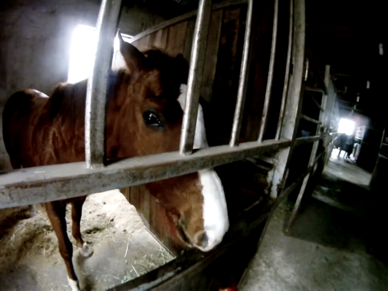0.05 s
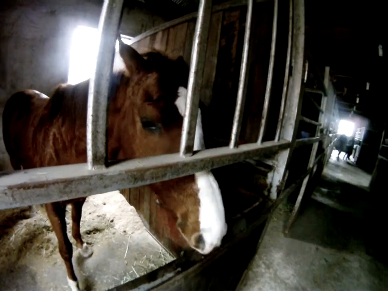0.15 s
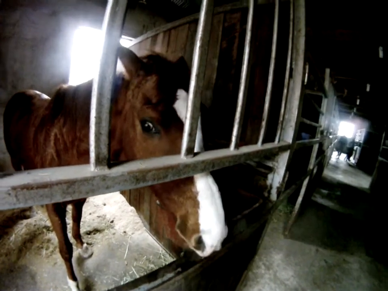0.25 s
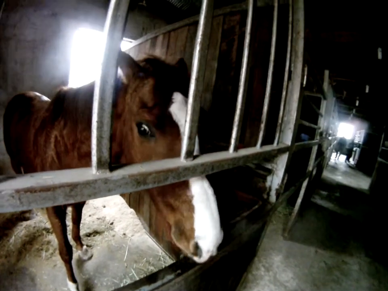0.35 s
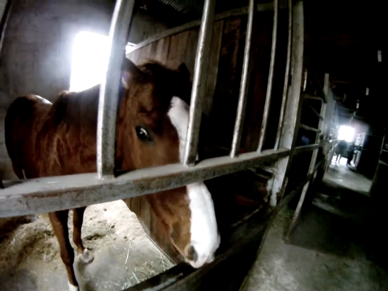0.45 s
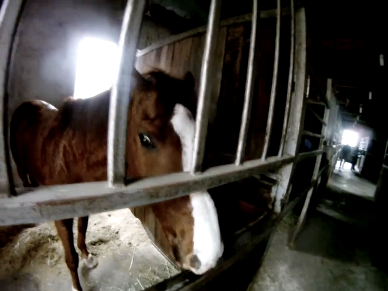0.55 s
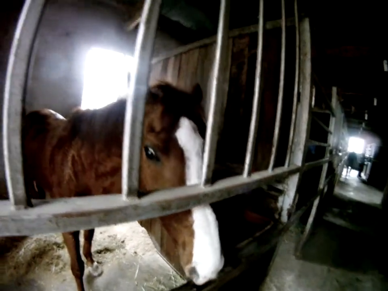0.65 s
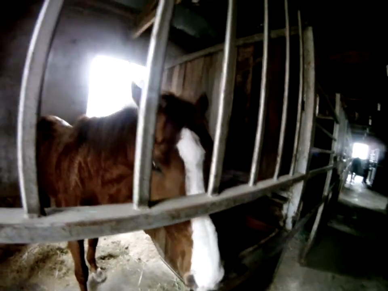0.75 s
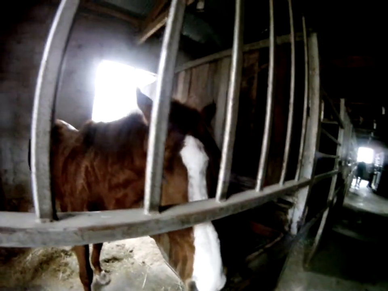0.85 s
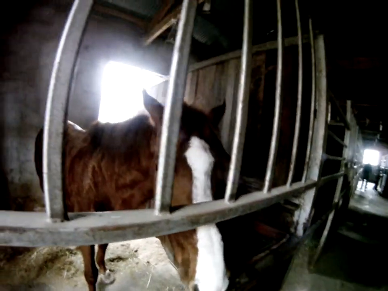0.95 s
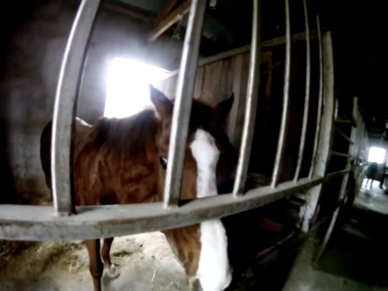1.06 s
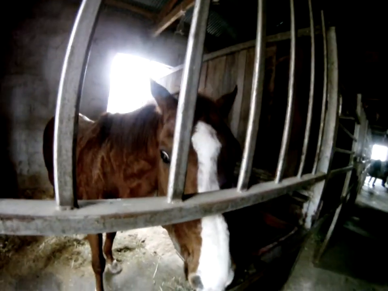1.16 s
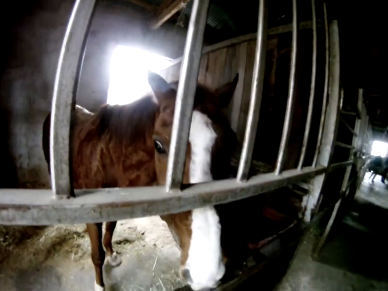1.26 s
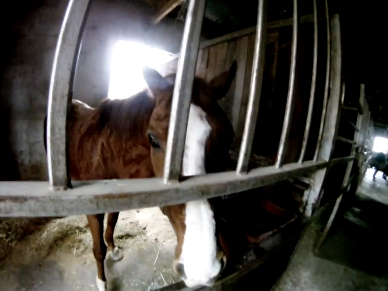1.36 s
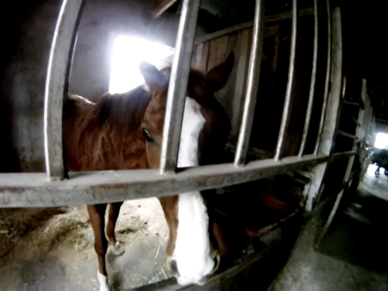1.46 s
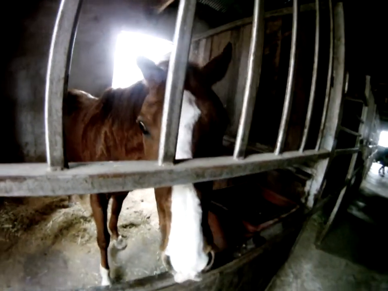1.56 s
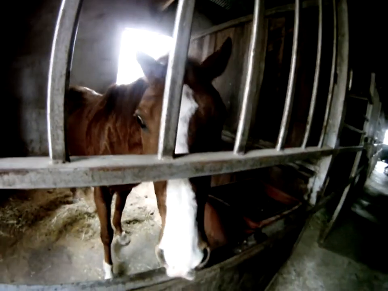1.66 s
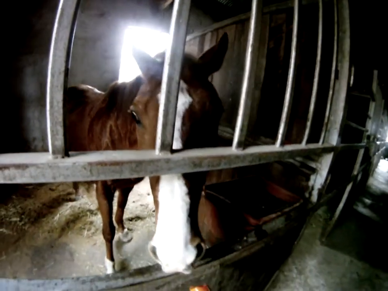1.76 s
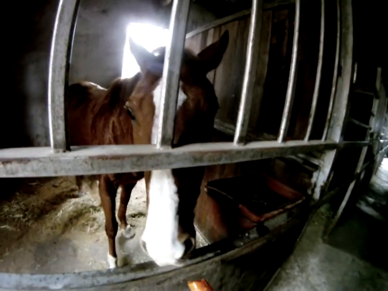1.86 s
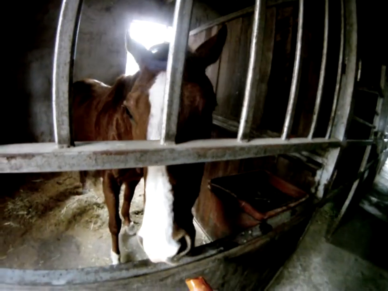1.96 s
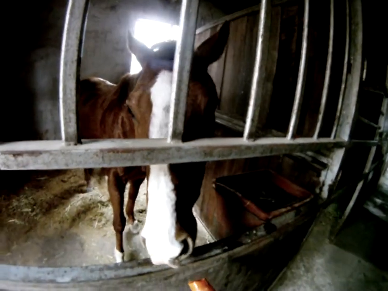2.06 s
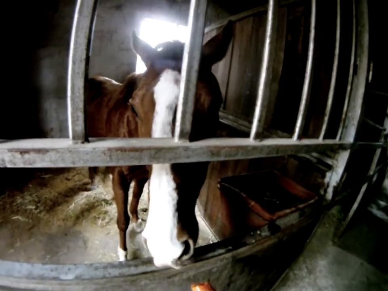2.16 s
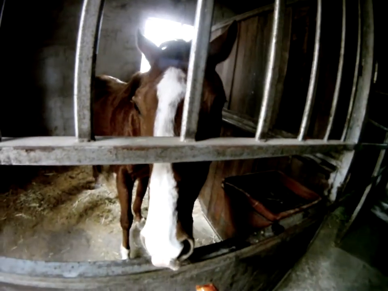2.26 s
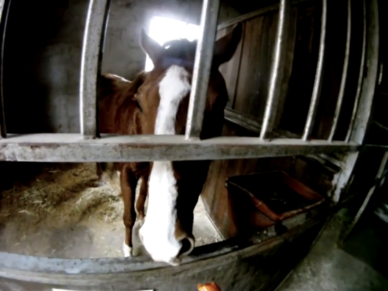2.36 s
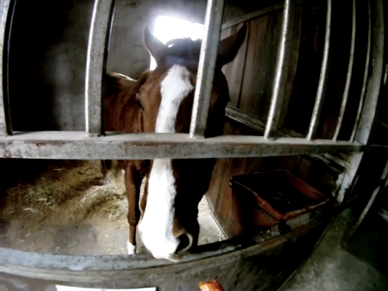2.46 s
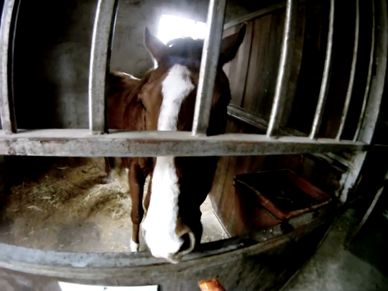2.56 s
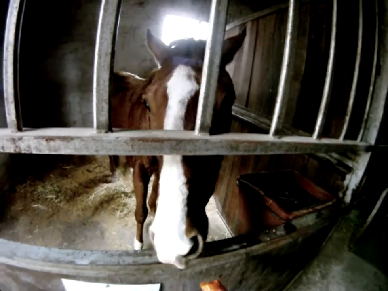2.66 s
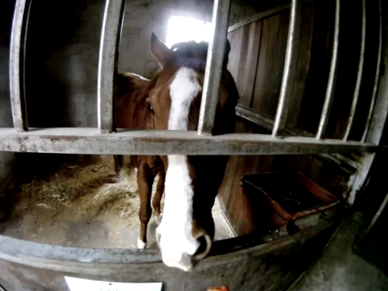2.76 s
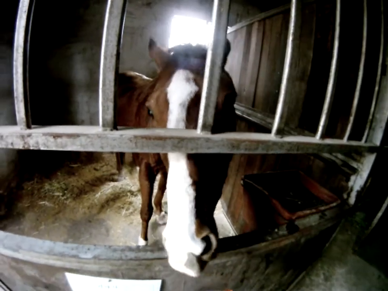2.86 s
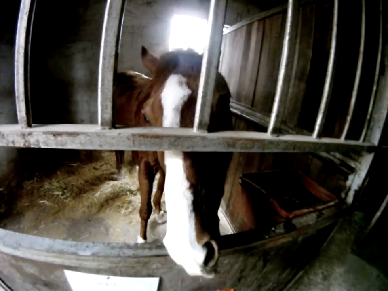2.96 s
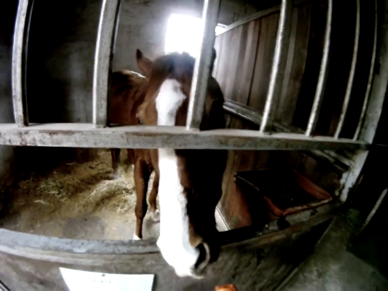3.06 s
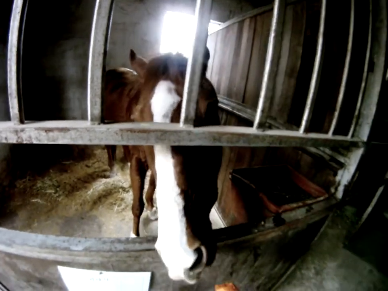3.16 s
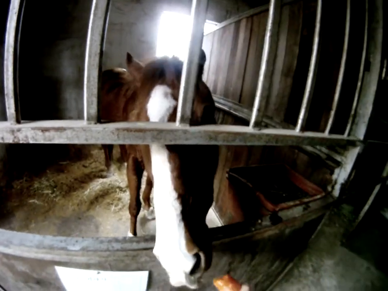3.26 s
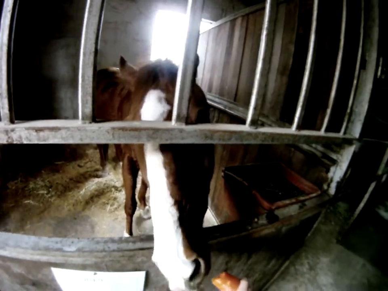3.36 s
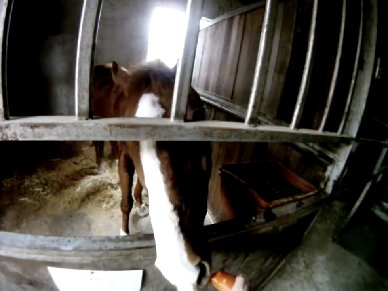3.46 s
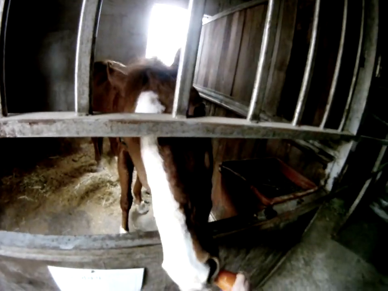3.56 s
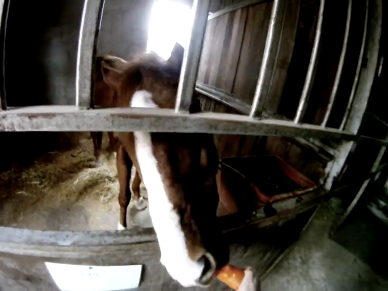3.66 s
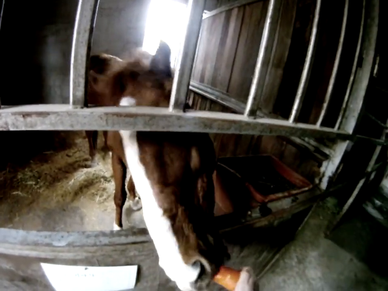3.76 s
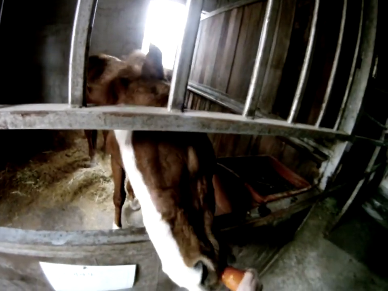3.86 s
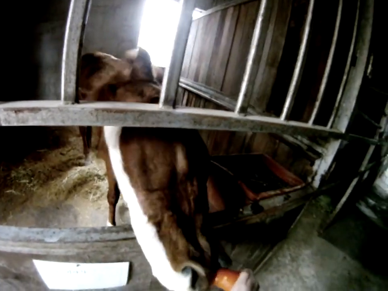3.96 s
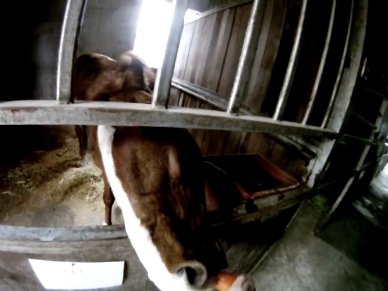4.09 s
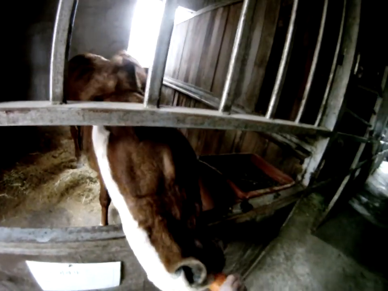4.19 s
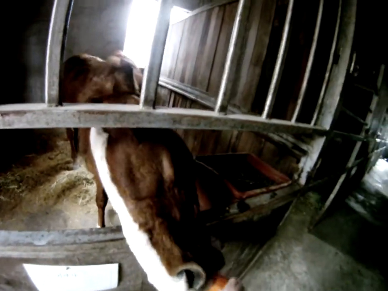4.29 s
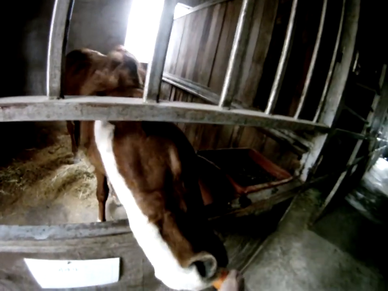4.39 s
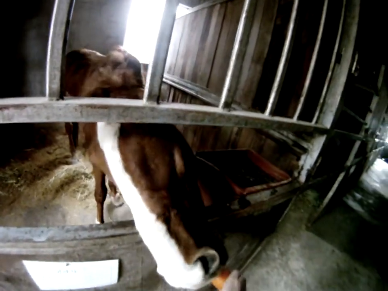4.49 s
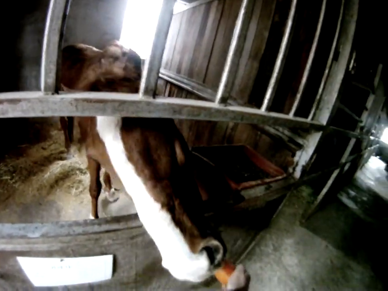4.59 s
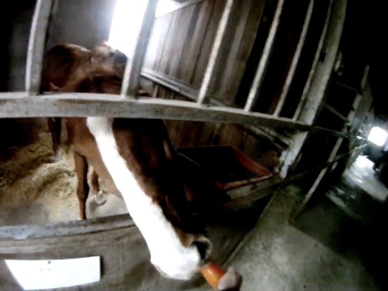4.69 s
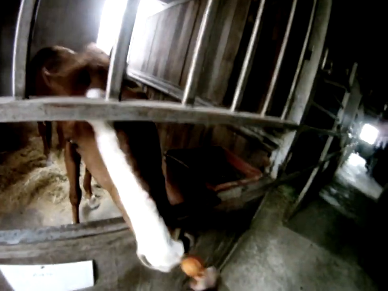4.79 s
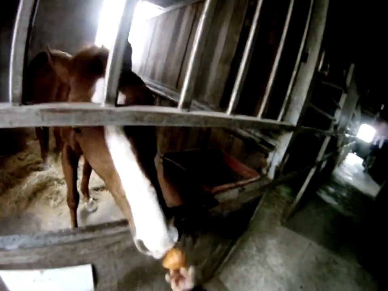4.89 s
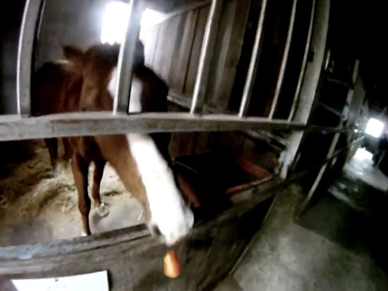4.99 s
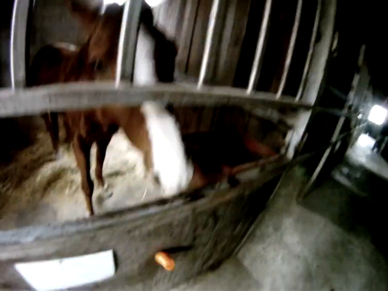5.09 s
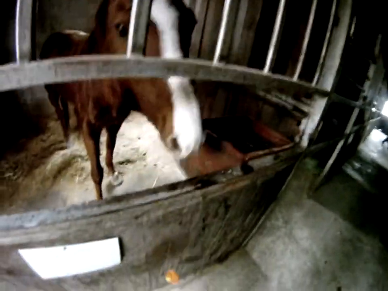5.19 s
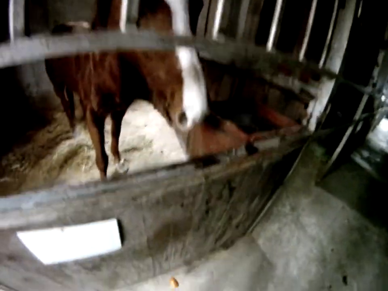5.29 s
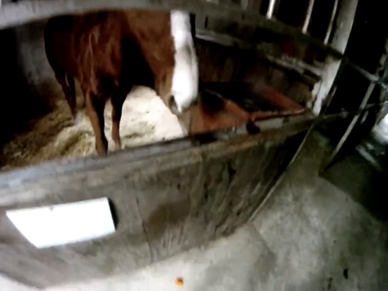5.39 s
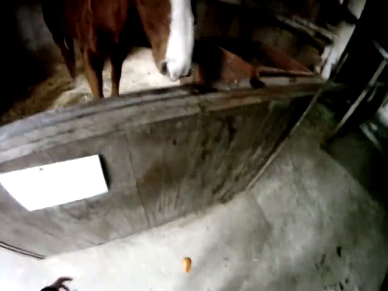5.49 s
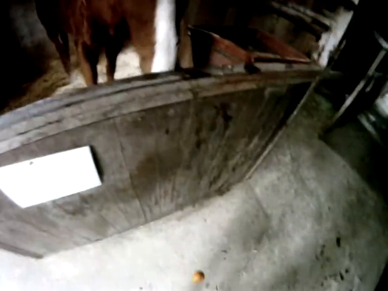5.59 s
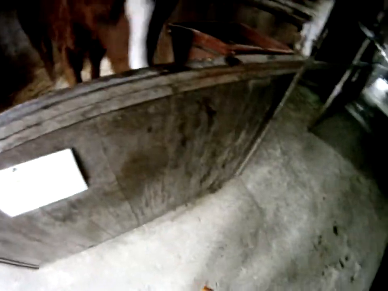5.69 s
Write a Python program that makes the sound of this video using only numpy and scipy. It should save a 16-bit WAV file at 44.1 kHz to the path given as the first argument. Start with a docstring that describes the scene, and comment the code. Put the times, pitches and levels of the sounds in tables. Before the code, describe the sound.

Very close, almost mono sound from a hand-held camera in a plastic case inside a quiet stable. Faint air hiss and low swaying rumble run throughout, with fingers rubbing the shell. Sparse ticks, dull bumps and tiny crisp snaps appear as a horse reaches for a carrot. Handling grows restless, then one sharp, hard knock strikes the case, followed by small ticks and a gritty scuff on concrete.

```python
"""A horse reaches through its stall bars for a carrot and drops it, in a quiet stable, heard from a camera
in a hand-held plastic case. From the start there is still air and hiss (shaped noise), a swaying rumble and
skin rubbing the shell (tiny random slips). Soon ticks and dull bumps (dying sines) join in, later faint
squeaks and small snaps (noise bursts). Near the end the hand grows restless and one sharp knock hits the
case (a flexing wall, ringing shell and gritty crack), followed by a scuff on the floor."""
import sys
import numpy as np
from scipy import signal
from scipy.fft import rfft, irfft, next_fast_len
from scipy.io import wavfile
from scipy.ndimage import map_coordinates

SR = 44100
rng = np.random.default_rng(int(sys.argv[2]) if len(sys.argv) > 2 else 0)


def generate_wav(sig):
    """Save sig (samples, or channels by samples) to the path in sys.argv[1] as 16-bit PCM at SR."""
    pcm = np.round(np.clip(np.atleast_2d(sig).T, -1, 1) * 32767).astype(np.int16)
    wavfile.write(sys.argv[1], SR, pcm)


N = 252913  # length in samples

# How strongly two places on the case wall sound at each pitch. Each row: pitch in Hz, relative level in dB.
LOW_WALL = [(100, -29), (600, -19), (950, -3.5), (1180, 5.5), (1300, -2), (1430, -8), (2000, -22),
            (2900, -25), (8000, -39), (10800, -28), (12000, -20), (13200, -22), (15500, -38)]
MIDDLE_WALL = [(100, -35), (700, -18.5), (1200, -14), (1450, -10.5), (1720, 2.5), (2000, 4), (2300, -8),
               (2800, -25.5), (5000, -33.5), (8000, -33), (10200, -20), (11500, -37.5), (14000, -22),
               (15500, -45)]
# The hard contacts as the camera chatters in its case. Each row: time in seconds, relative level in dB.
CHATTER_HITS = [(5.445, -17), (5.4462, -8.5), (5.4507, -19), (5.4529, -13.5), (5.4554, -6.5)]


def amp(db):
    """Turn decibels into a gain."""
    return 10 ** (np.asarray(db) / 20)


def unit(x):
    """Scale a sound to an rms level of 1."""
    return x / np.sqrt(np.mean(x ** 2) + 1e-20)


def clock():
    """The time of every sample, in seconds."""
    return np.arange(N) / SR


def along(points, hz):
    """Read a curve of (Hz, value) points, joined by straight lines on a log pitch axis."""
    point_hz, values = np.transpose(points)
    return np.interp(np.log(hz + 1), np.log(point_hz + 1), values)


def bells(peaks, hz):
    """Add up bell-shaped peaks or dips, in decibels."""
    return sum(db / (1 + (2 * (hz - centre) / width) ** 2) for centre, width, db in peaks)


def coloured(x, gain_db):
    """Filter a sound with any curve of decibels against pitch, without sounding ahead of time."""
    size = 2 * next_fast_len(N // 2 + SR // 4)
    log_gain = np.log(amp(gain_db(np.fft.rfftfreq(size, 1 / SR))))
    # folding the cepstrum onto positive times gives a filter that only reacts afterwards
    cepstrum = irfft(log_gain, size)
    cepstrum[1:size // 2] *= 2
    cepstrum[size // 2 + 1:] = 0
    response = np.exp(rfft(cepstrum))
    return irfft(rfft(x, size) * response, size)[:N]


def noise(spectrum):
    """Steady noise of rms 1 with the given spectrum."""
    return unit(coloured(rng.standard_normal(N), lambda hz: along(spectrum, hz)))


def fade(s, t60):
    """An envelope that jumps up at s and falls by 60 dB in t60 seconds."""
    envelope, start = np.zeros(N), round(s * SR)
    age = np.arange(min(round(2 * t60 * SR), N - start)) / SR
    envelope[start:start + len(age)] = amp(-60 * age / t60)
    return envelope


def struck(s, t60, rise):
    """A dying envelope that takes a moment to build up."""
    return fade(s, t60) * (1 - fade(s, rise))


def swell(t, s, length):
    """A bell-shaped envelope around s whose power is above half for the given length."""
    return np.exp(-np.log(4) * np.minimum(((t - s) / length) ** 2, 20))


def tone(envelope, hz):
    """A sine under an envelope, starting where the envelope does."""
    out, on = np.zeros(N), np.flatnonzero(envelope > 1e-7)
    out[on] = envelope[on] * np.sin(2 * np.pi * hz * np.arange(len(on)) / SR)
    return out


def wobble(rate):
    """A smooth random curve through `rate` random values a second."""
    coarse = clock()[::200]
    curve = map_coordinates(rng.standard_normal(256), [coarse * rate], mode="mirror")
    return np.interp(clock(), coarse, curve)


def driven(law):
    """The gain of a sound that grows with the effort of the hand and wavers on its own."""
    # How restless the hand is: calm at first, it shifts as the carrot is offered.
    # Each row: time in seconds, effort in dB.
    effort_points = [(0, -20), (0.3, -16), (0.45, -20), (1.15, -16.5), (2.45, -19), (2.8, -19),
                     (3.1, -11.5), (3.42, -14.5), (3.65, -11), (4.2, -9.5), (4.46, -13.5), (4.62, -1.5),
                     (4.9, 0), (5.35, 0), (5.73, -6)]
    level_db, growth, waver_db = law
    effort_db = np.interp(clock(), *np.transpose(effort_points))
    return amp(level_db + growth * effort_db + waver_db * wobble(rate=11))


def friction(wall, slips_per_s, spread_db, smooth):
    """Gritty contact: tiny slips of uneven size and a smooth hiss ring one wall curve and the overtones."""
    # Narrow overtones of the shell. Each row: pitch in Hz, width in Hz, height in dB.
    overtone_peaks = [(3655, 460, 10.5), (8350, 180, 10.5), (9920, 520, 14.5), (10810, 230, 17),
                      (13150, 230, 6), (14000, 740, 13)]
    happens = rng.random(N) < slips_per_s / SR
    sizes = amp(spread_db * rng.standard_normal(N))
    slips = happens * rng.choice([-1, 1], N) * sizes
    force = unit(slips) + smooth * rng.standard_normal(N)
    return unit(coloured(force, lambda hz: along(wall, hz) + bells(overtone_peaks, hz)))


def stable(level_db=-63.5):
    """The still air of the stable and the microphone's hiss, as steady shaped noise."""
    # Each row: pitch in Hz, relative level in dB.
    air_spectrum = [(20, 6.5), (60, 12), (150, 5.5), (300, 3.5), (700, -1.5), (1150, -3), (1420, -4),
                    (2050, -6), (2800, -6.5), (5000, -10), (7000, -13), (10000, -16), (12000, -16),
                    (14300, -19.5)]
    return amp(level_db) * noise(air_spectrum)


def movement():
    """The swaying hand rumbles through the case and lurches now and then, over a dull shuffle."""
    # Low rumble of the sway, then the shuffle. Each row: pitch in Hz, relative level in dB.
    sway_spectrum = [(5, -28.5), (14, 3), (32, 2.5), (45, -9.5), (75, -26), (130, -41.5), (300, -56.5)]
    shuffle_spectrum = [(30, -28), (90, -0.5), (220, 0), (400, -9), (750, -9.5), (1100, -11.5), (2500, -38),
                        (8000, -64)]
    # How each follows the hand: level at full effort in dB, dB per dB of effort, random wavering in dB.
    sway_law = (-42.5, 0.95, 1.4)
    shuffle_law = (-61, 0.41, 0.86)
    # The hand jerks and rocks the whole camera.
    # Each row: middle in seconds, length in seconds, level in dB, pitch in Hz.
    lurch_rows = [(0.359, .02, -47.5, 44.8), (1.554, .055, -34, 31), (4.181, .1, -43.5, 23.97),
                  (4.665, .08, -30.5, 22.88)]
    lurches = sum(amp(db) * tone(swell(clock(), s, length), hz) for s, length, db, hz in lurch_rows)
    sway = driven(sway_law) * noise(sway_spectrum)
    shuffle = driven(shuffle_law) * noise(shuffle_spectrum)
    return lurches + sway + shuffle


def stroke_power(t, catch_s=0.045, reach_db_per_octave=25, skew=1.13, edge=2.5):
    """Power in each wall mode: every stroke shares its own among the modes nearest to its pitch."""
    # A finger slides on the shell. Each row: middle of the first catch in seconds, length in seconds,
    # level in dB, pitch it excites most in Hz, number of times it catches.
    stroke_rows = [(0.623, 0.055, -57, 1680, 1), (0.823, .085, -66.5, 2120, 1),
                   (1.22, 0.041, -62.5, 1260, 1), (1.4, 0.053, -57, 2200, 1), (1.51, 0.22, -61.5, 2320, 1),
                   (1.788, 0.038, -60.5, 1150, 1), (1.997, 0.085, -60.5, 2380, 1),
                   (2.368, .068, -60.5, 1150, 1), (2.554, 0.072, -55, 2300, 1), (2.75, 0.065, -61, 2400, 1),
                   (2.88, .028, -55, 1360, 1), (3.22, 0.22, -62.5, 2300, 1), (3.471, 0.03, -56, 1540, 1),
                   (4.043, 0.062, -62, 1800, 1), (4.167, .022, -53, 1540, 5), (4.59, .11, -56.5, 2360, 1),
                   (4.657, 0.072, -55.5, 1400, 1), (4.762, 0.026, -48.5, 1720, 2),
                   (4.946, .042, -48, 1700, 1), (5.03, .022, -52, 1680, 1), (5.129, 0.093, -49, 1800, 1),
                   (5.261, .028, -52, 1760, 2), (5.42, 0.076, -53, 2050, 1), (5.538, 0.028, -52.5, 2060, 1),
                   (5.635, .028, -48, 2380, 1), (5.702, 0.058, -53, 2090, 1)]
    # Pitches of the low, damped, middle and high wall modes, in Hz.
    wall_hz = (1180, 1490, 1870, 2360)
    power = np.zeros((len(wall_hz), len(t)))
    for s, length, db, hz, catches in stroke_rows:
        octaves_away = np.abs(np.log2(np.array(wall_hz) / hz))
        share = amp(-reach_db_per_octave * octaves_away) ** 2
        # a juddering finger catches again every catch_s seconds
        for middle in s + catch_s * np.arange(catches):
            # it starts faster and ends slower than an even swell; an edge of 2 would be a plain bell
            half_length = length / 2 * skew ** np.sign(t - middle)
            envelope = .5 ** np.minimum(np.abs((t - middle) / half_length) ** edge, 60)
            power += np.outer(share / share.sum(), amp(db) ** 2 * envelope)
    return power


def fingers():
    """Finger strokes drive four wall modes, over the constant small rubbing of the grip."""
    # The wall damped by the fingers, so broader, and the high wall.
    # Each row: pitch in Hz, relative level in dB.
    damped_wall = [(100, -35), (700, -15), (1000, -4), (1350, 1.5), (1700, -2), (2200, -7), (2900, -22),
                   (8000, -31), (11500, -28), (14000, -23), (15500, -38)]
    high_wall = [(100, -44), (1400, -30), (1900, -3.5), (2280, 8.5), (2520, -1.5), (2900, -13.5),
                 (3600, -14.5), (5000, -20.5), (8000, -21), (9600, -16.5), (11000, -34.5), (14400, -20),
                 (15500, -29)]
    # How rubbing follows the hand, before the mode shares below:
    # level at full effort in dB, dB per dB of effort, random wavering in dB.
    rub_law = (-61.5, 0.64, 1.6)
    # How much the resting grip rubs the low, damped, middle and high modes, in dB.
    rub_shares_db = (-4, -6, -1.5, -0.5)
    coarse = clock()[::40]
    gains = []
    for power, rub_db in zip(stroke_power(coarse), rub_shares_db):
        stroke_gain = np.interp(clock(), coarse, np.sqrt(power))
        rub_gain = amp(rub_db) * driven(rub_law)
        gains.append(np.hypot(stroke_gain, rub_gain))  # adds their powers
    low, damped, middle, high = gains
    return (low * friction(LOW_WALL, slips_per_s=500, spread_db=2.5, smooth=0.25)
            + damped * friction(damped_wall, slips_per_s=800, spread_db=3, smooth=0.6)
            + middle * friction(MIDDLE_WALL, slips_per_s=900, spread_db=0.5, smooth=0.7)
            + high * friction(high_wall, slips_per_s=700, spread_db=3, smooth=0.64))


def ticks(low_hz=1220, middle_hz=1950, grit_db=-3):
    """A sudden slip of the grip plucks two wall modes and sets off a short gritty burst in them."""
    # Each row: time in seconds, low mode level in dB, middle mode level in dB, time to fall 60 dB in seconds.
    # The levels are those before the soft start.
    tick_rows = [(0.341, -57, -44.5, 0.013), (1.966, -56, -48, 0.02), (2.004, -65, -48.5, 0.033),
                 (3.188, -59, -50, 0.042), (4.023, -53, -33, 0.028), (4.589, -28, -37, 0.027),
                 (4.629, -36, -46, 0.03), (5.521, -54, -46, 0.043), (5.621, -50, -45, 0.05)]
    out = np.zeros(N)
    low_grit = amp(grit_db) * friction(LOW_WALL, slips_per_s=3100, spread_db=6.0, smooth=0.35)
    middle_grit = amp(grit_db) * friction(MIDDLE_WALL, slips_per_s=4600, spread_db=5.0, smooth=0.98)
    for s, low_db, middle_db, t60 in tick_rows:
        envelope = struck(s, t60, rise=.005)
        detune = 1 + 0.025 * rng.standard_normal()  # the grip loads the wall differently each time
        out += amp(low_db) * (tone(envelope, low_hz * detune) + envelope * low_grit)
        out += amp(middle_db) * (tone(envelope, middle_hz * detune) + envelope * middle_grit)
    return out


def bumps(rise_share=0.16):
    """Soft, dull contacts that ring briefly at one pitch each."""
    # Each row: time in seconds, level before the soft start in dB, pitch in Hz, time to fall 60 dB in seconds.
    bump_rows = [(0.355, -54, 155, 0.078), (4.473, -56, 266, 0.078), (4.589, -36.5, 298, 0.044),
                 (5.354, -33.5, 724, 0.01)]
    return sum(amp(db) * tone(struck(s, t60, rise_share * t60), hz) for s, db, hz, t60 in bump_rows)


def squeaks():
    """Where a fingertip sticks and slips regularly the rubbing turns into a weak tone."""
    # Each row: middle in seconds, length in seconds, pitch in Hz, level in dB.
    squeak_rows = [(2.605, .05, 650, -65.5), (5.048, 0.034, 643, -59), (5.145, 0.053, 756, -56.5)]
    return sum(amp(db) * tone(swell(clock(), s, length), hz) for s, length, hz, db in squeak_rows)


def nibbles(level_db=4):
    """Lips and carrot snap softly: small crisp noise bursts that die within hundredths of a second."""
    # Each row: time in seconds, relative level in dB.
    snap_rows = [(2.9063, -59), (3.273, -52.5), (3.466, -56), (3.7757, -60), (4.1255, -56), (4.529, -53.5),
                 (4.589, -45.5), (4.6866, -52.5), (5.3546, -46.5)]
    # Each row: pitch in Hz, relative level in dB.
    snap_spectrum = [(200, -11), (1100, 7), (2800, -9), (3800, -11), (4700, 2), (7400, -1), (9000, -17),
                     (15000, -19)]
    bursts = sum(amp(db) * struck(s, t60=.022, rise=.008) for s, db in snap_rows)
    return amp(level_db) * bursts * noise(snap_spectrum)


def flex(s=5.4463, width_s=0.0014, rebound_after_s=0.00644, rebound_db=4.0, edge=1.46, leak_hz=18):
    """The knock pushes the case wall in, it snaps back out, and the pressure leaks away."""
    def pulse(peak):
        """One short pressure pulse."""
        return np.exp(-np.minimum(np.abs((clock() - peak) / width_s) ** edge, 40))

    pressure = pulse(s) - amp(rebound_db) * pulse(s + rebound_after_s)
    leak = signal.butter(1, leak_hz, "highpass", fs=SR, output="sos")
    return signal.sosfilt(leak, pressure)


def shell_ring():
    """Each hard contact of the chatter sets the shell ringing at several pitches."""
    # Each row: pitch in Hz, relative level in dB, time to fall 60 dB in seconds.
    shell_modes = [(923, -7, 0.014), (1095, -5, 0.019), (1570, -3.5, .012), (1890, -2, 0.01),
                   (2126, -1.5, 0.012), (3680, -16, 0.0086)]
    ring, age = np.zeros(N), np.arange(SR // 10) / SR
    modes = np.zeros(len(age))
    for k, (hz, db, t60) in enumerate(shell_modes):
        # neighbouring modes start in opposite directions, so the ring takes a moment to build
        modes += (-1) ** k * amp(db - 60 * age / t60) * np.sin(2 * np.pi * hz * age)
    for s, db in CHATTER_HITS:
        ring[round(s * SR):][:len(age)] += amp(db + rng.standard_normal()) * modes
    return ring


def knock(flex_db=-4, ring_db=3.5, crack_db=-3, crack_t60=0.012, rise=0.0014, buzz_db=-24, buzz_t60=0.044):
    """The wall flexes like a drum skin while hard contacts ring the shell, crack and leave a short buzz."""
    # Each row: pitch in Hz, relative level in dB.
    crack_spectrum = [(100, 2), (700, -11.5), (1100, 7), (2100, 7), (2800, -15), (3600, -9), (4600, -6.5),
                      (5800, -28), (7400, -9), (9200, -14.5), (10300, -6.5), (11500, -18), (14100, -8),
                      (15300, -25)]
    contact = np.zeros(N)
    for s, db in CHATTER_HITS:
        contact += amp(db) * (struck(s, crack_t60, rise) + amp(buzz_db) * fade(s, buzz_t60))
    crack = contact * friction(crack_spectrum, slips_per_s=6100, spread_db=4.5, smooth=0.7)
    return amp(flex_db) * flex() + amp(ring_db) * shell_ring() + amp(crack_db) * crack


def scuff(s=5.615, length=0.028, level_db=-51.5):
    """A short gritty scrape on the concrete, made as a swell of shaped noise."""
    # Each row: pitch in Hz, relative level in dB.
    scuff_spectrum = [(500, -20), (2000, 1), (2600, 13.5), (3200, -10), (3800, 6), (5000, -2), (7000, -4),
                      (8300, -1), (11000, -17), (15000, -8)]
    return amp(level_db) * swell(clock(), s, length) * noise(scuff_spectrum)


def scene(hiss_side_db=-80):
    """Both channels carry nearly the same sound, with a faint difference and a very quiet hiss of opposite sign."""
    # How much the channels differ. Each row: pitch in Hz, side level against mid in dB.
    side_share = [(30, -58), (150, -32), (500, -27), (1100, -41), (2200, -46), (4500, -20), (9000, -44),
                  (14000, -42)]
    # Hiss of opposite sign in the two channels. Each row: pitch in Hz, relative level in dB.
    side_hiss = [(30, -45), (300, -1.5), (1500, -6.5), (4000, -4), (8000, -8.5), (11000, -29)]
    mid = stable() + movement() + fingers() + ticks() + bumps() + squeaks() + nibbles() + knock() + scuff()
    side = amp(hiss_side_db) * noise(side_hiss) - coloured(mid, lambda hz: along(side_share, hz))
    return np.array([mid + side, mid - side])


def record(dry, ceiling=.92, top_hz=15500):
    """The microphone port cuts two dips, loud peaks round off, and sound above top_hz is removed."""
    # Dips of the port. Each row: pitch in Hz, width in Hz, depth in dB.
    port_dips = [(6010, 630, -14.5), (12090, 2000, -11.5)]
    heard = np.array([coloured(channel, lambda hz: bells(port_dips, hz)) for channel in dry])
    heard = heard / (1 + np.abs(heard / ceiling) ** 8) ** (1 / 8)
    return signal.sosfilt(signal.ellip(12, .1, 90, top_hz, fs=SR, output="sos"), heard)


dry = scene()
out = record(dry)
generate_wav(out)
```